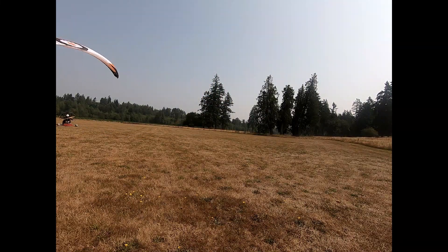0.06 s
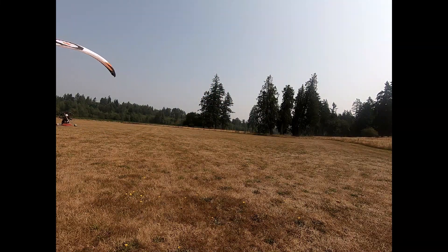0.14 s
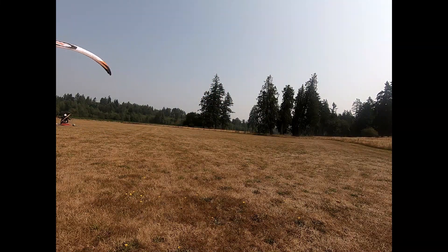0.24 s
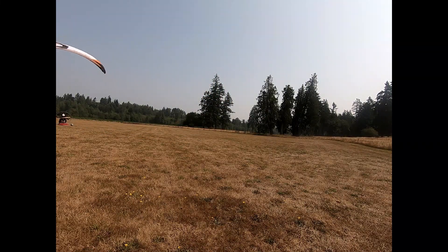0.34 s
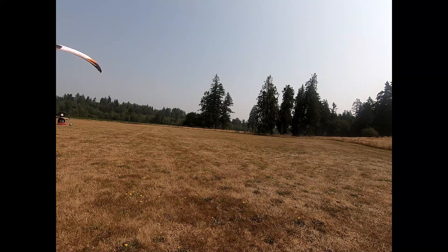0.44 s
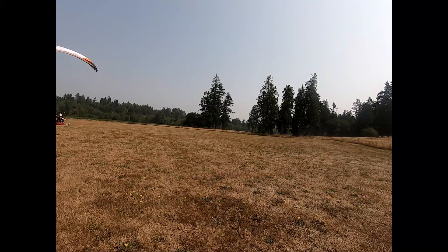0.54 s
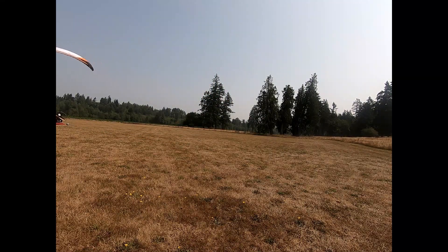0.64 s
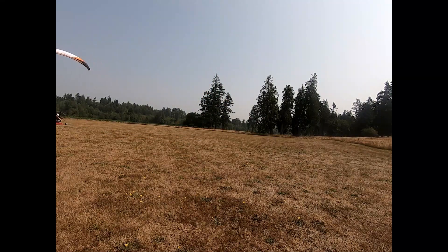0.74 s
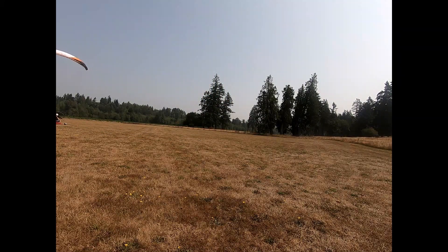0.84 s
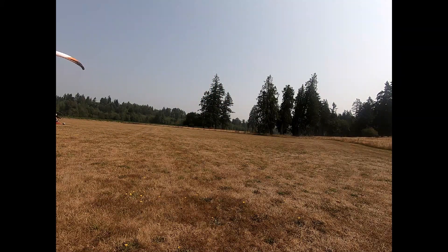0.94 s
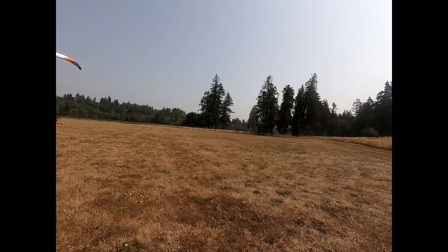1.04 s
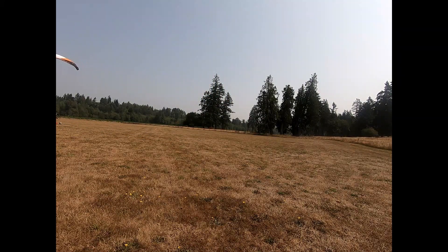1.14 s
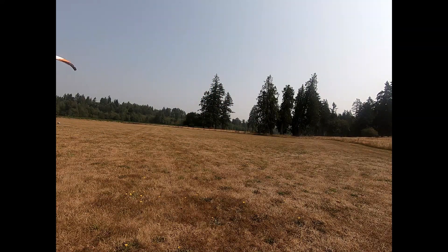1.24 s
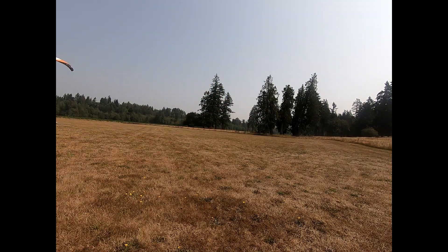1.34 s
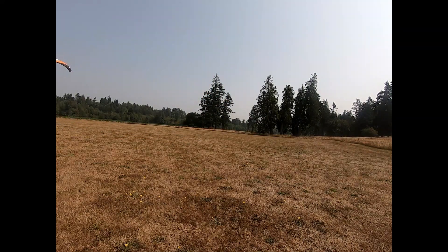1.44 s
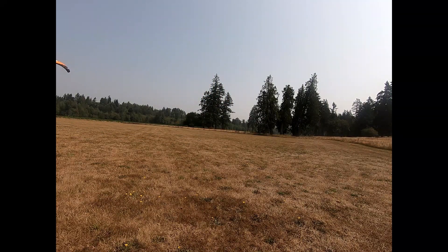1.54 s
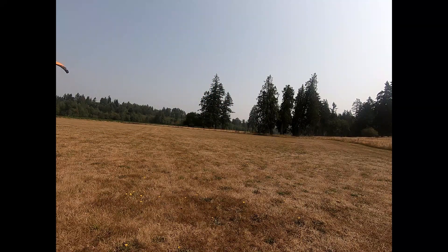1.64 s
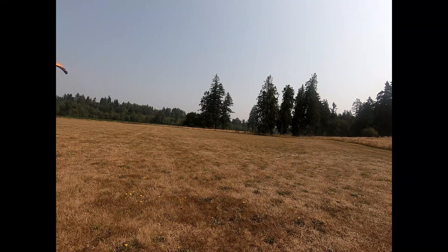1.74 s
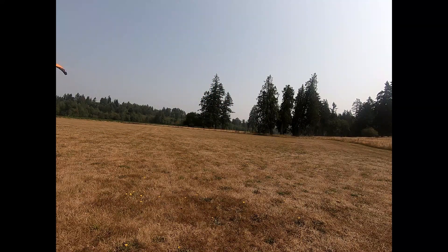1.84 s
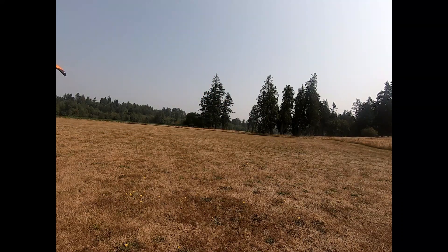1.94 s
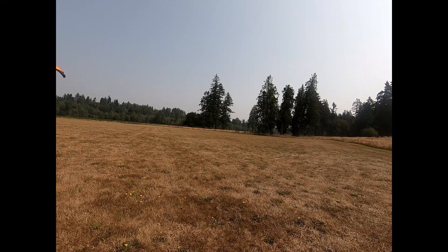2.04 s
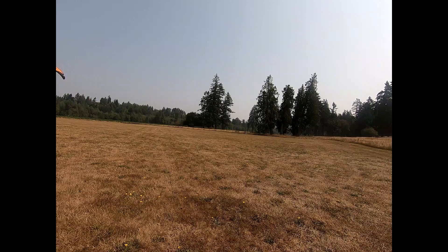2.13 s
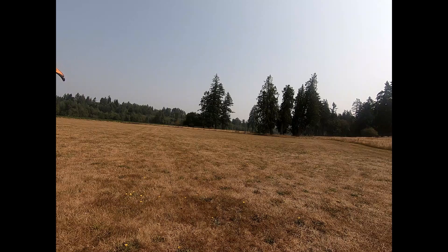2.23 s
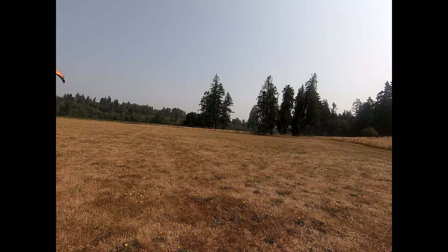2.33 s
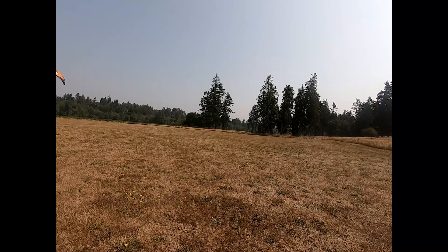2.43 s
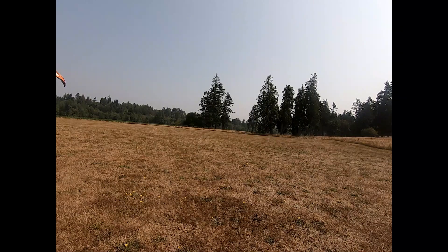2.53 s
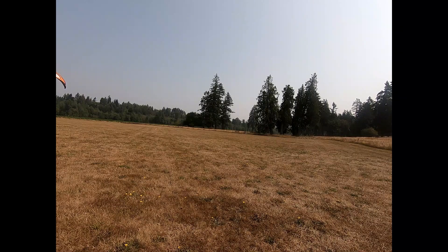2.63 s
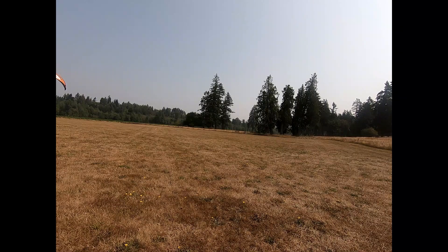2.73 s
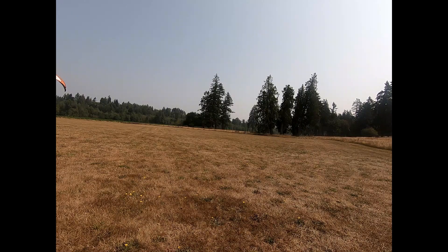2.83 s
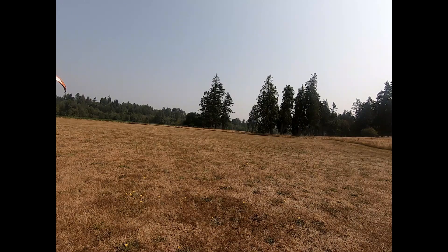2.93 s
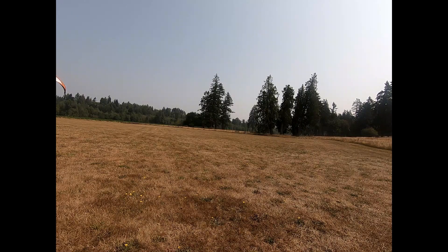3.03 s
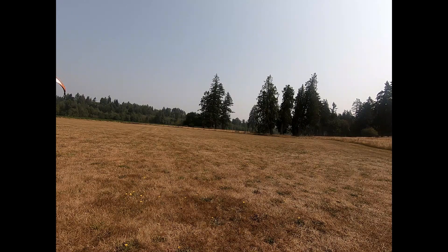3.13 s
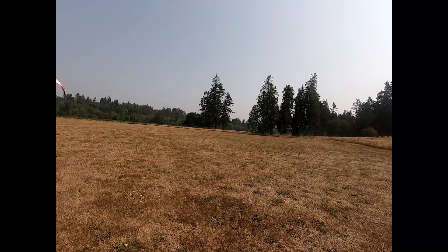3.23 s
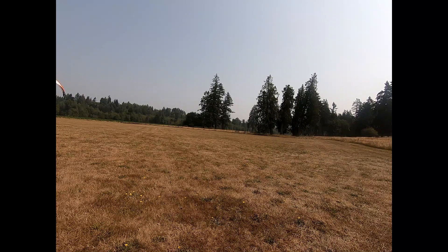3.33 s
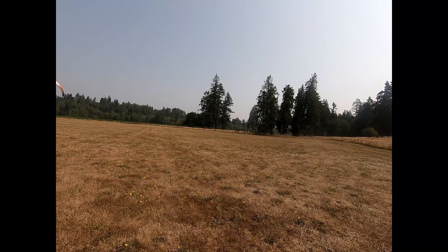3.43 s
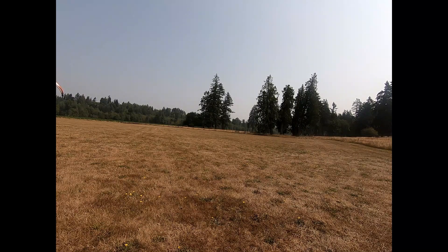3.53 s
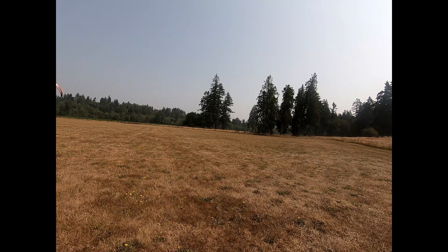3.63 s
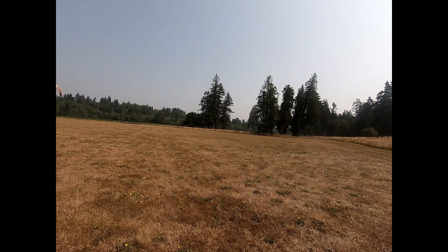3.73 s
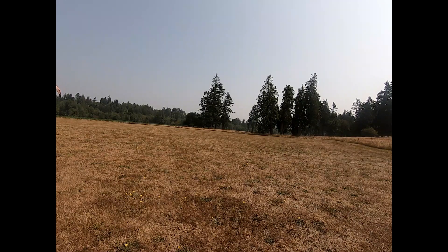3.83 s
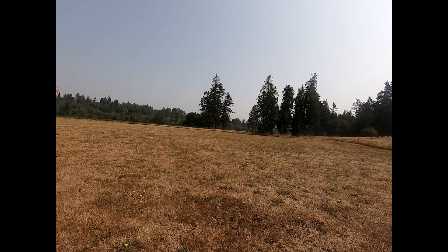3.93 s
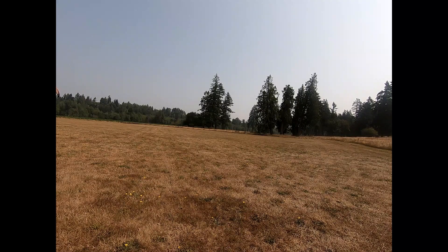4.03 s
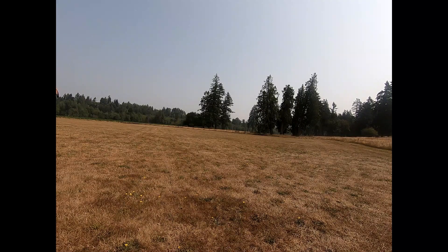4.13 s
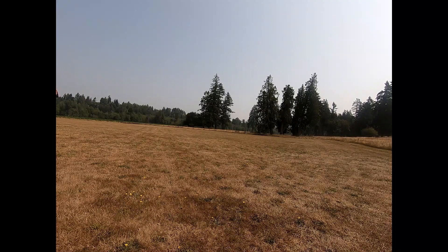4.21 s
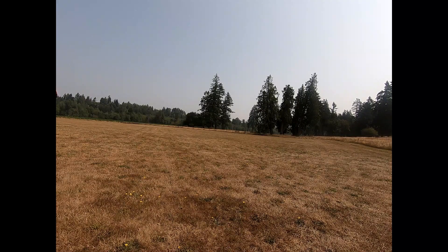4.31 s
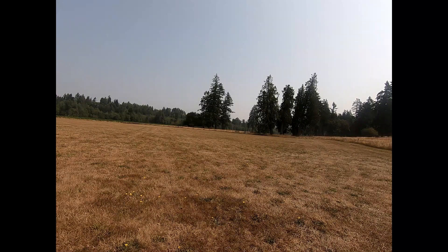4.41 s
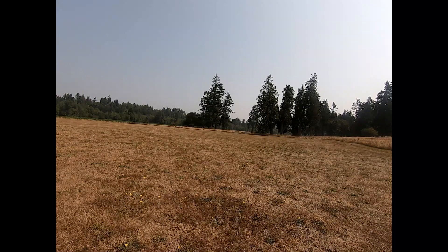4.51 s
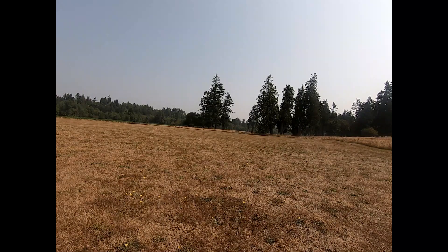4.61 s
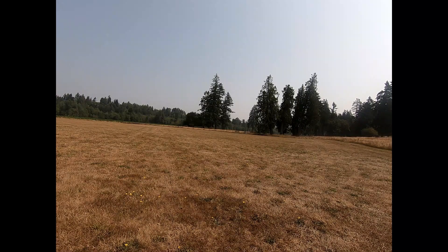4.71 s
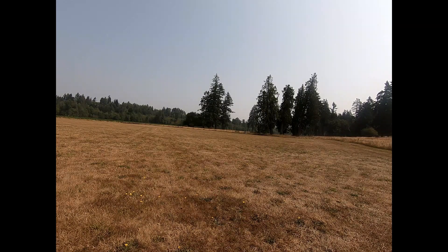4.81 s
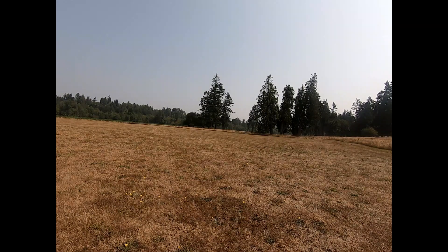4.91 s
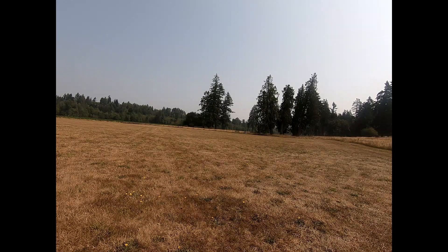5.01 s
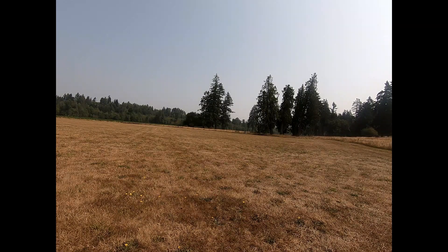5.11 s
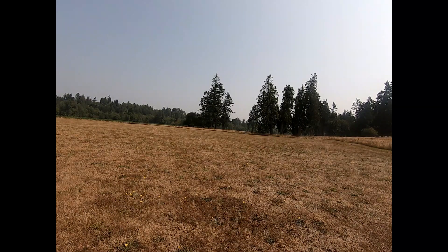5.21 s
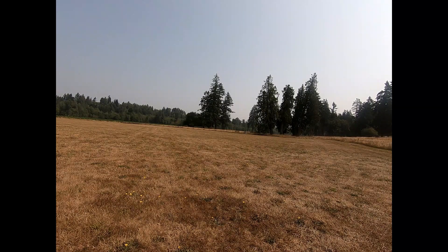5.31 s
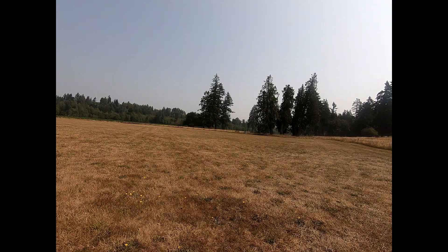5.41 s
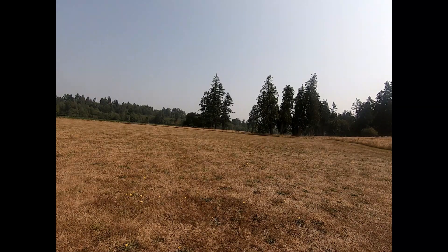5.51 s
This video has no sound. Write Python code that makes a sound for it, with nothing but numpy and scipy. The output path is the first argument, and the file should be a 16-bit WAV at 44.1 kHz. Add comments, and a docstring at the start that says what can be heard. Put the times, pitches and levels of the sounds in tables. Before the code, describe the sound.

A two-stroke paramotor drones away over a dry field, buzzing hard, sagging to a stumbling idle, revving up again, then slowly sinking.

```python
"""A two-stroke paramotor taxis away over a dry field: full throttle, stumbling idle, up again, slowly down.
Low crank orders make the exhaust drone, high orders the rasp; the geared propeller tone beats against them.
Firing-gated noise gives gas, wash and blade hiss; a tree line returns a faint echo.
Low noise makes churn and wind; clustered snaps make a dry rustle close by.
In the last instant the sound jumps, with a tick, to high revs.
"""
import sys
import numpy as np
from scipy import signal
from scipy.fft import rfft, irfft
from scipy.io import wavfile
from scipy.ndimage import uniform_filter1d

SR = 44100
rng = np.random.default_rng(int(sys.argv[2]) if len(sys.argv) > 2 else 0)


def wav_record(signal):
    """Record a signal, one row per channel, as 16-bit PCM in the file named by sys.argv[1]."""
    frames = np.transpose(np.atleast_2d(signal))
    bounded = np.clip(frames, -1, 1)
    # unit amplitude maps onto the largest positive 16-bit level
    quanta = np.round(bounded * 32767).astype(np.int16)
    wavfile.write(sys.argv[1], SR, quanta)


N = 245186
TIME = np.arange(N) / SR
BINS_HZ = np.maximum(np.arange(N // 2 + 1) * SR / N, 1)

# All dB settings are relative: gains, gating and the ports act after them.
# Crank speed: (time [s], rate [firings/s])
CRANK_SPEED = [(0.0, 72.1), (0.3, 84.5), (0.4, 87.1), (0.77, 88.0), (1.14, 88.1), (1.26, 85.6),
               (1.36, 81.5), (1.45, 79.8), (1.57, 76.7), (1.83, 85.5), (1.94, 86.6), (1.98, 83.4),
               (2.1, 71.3), (2.2, 63.3), (2.42, 52.0), (2.61, 45.4), (2.8, 43.2), (3.0, 44.2), (3.1, 47.0),
               (3.2, 52.8), (3.35, 62.0), (3.51, 69.4), (3.79, 79.0), (3.94, 81.1), (4.18, 80.0),
               (4.55, 72.3), (4.85, 66.3), (5.05, 58.9), (5.19, 55.7), (5.49, 52.5)]
# Firing strength, sagging on closed throttle: (time [s], gain [dB])
FIRING_GAIN = [(0.05, 0.5), (1.2, -0.5), (1.55, 0), (2.05, 0.5), (2.25, -4), (2.65, -8), (2.9, -10.5),
               (3.3, 1), (4.36, 1), (4.39, -0.5), (4.8, -4), (5.2, -1)]
# Low exhaust orders, from the first up:
# (level at full speed [dB], slope [dB/doubling], gain while turning away [dB], time of half that gain [s])
EXHAUST_ORDERS = [(-19, 22, 2, 3), (-27, 3, -2.5, 3.3), (-48, -2, 7, 2.1), (-48, -7, -4, 1)]
# Lone hard firings on closed throttle: (time [s], level [dB])
HARD_FIRINGS = [(2.123, -20), (2.154, -24), (2.198, -14), (2.281, -14), (2.295, -14.5), (2.367, -20.5),
                (2.389, -17.5), (2.473, -14), (2.514, -20.5), (2.546, -17), (2.674, -18.5), (2.74, -19),
                (2.81, -18), (2.864, -25), (4.965, -22), (5.101, -24.5), (5.291, -25), (5.331, -20),
                (5.435, -18)]
# Blade tone as the machine turns: (time [s], tone [dB], second [dB], third [dB])
BLADE_LEVELS = [(0.08, -31.5, -36, -48), (0.45, -27, -44, -46.5), (1.08, -27, -46, -55),
                (1.269, -39, -44.5, -55), (1.8, -39.5, -39.5, -48.5), (2.101, -29.5, -40.5, -65),
                (2.45, -32.5, -42, -50), (2.7, -41.5, -38, -42), (2.95, -30, -32, -36.5),
                (3.15, -28, -25.5, -38.5), (3.3, -23.5, -30, -44), (3.6, -31.5, -36, -49.5),
                (3.8, -29.5, -39, -61.5), (4.1, -31, -43.5, -56.5), (4.699, -29, -43, -45),
                (5.3, -28, -36, -49)]

# Rasp order levels when close, turning, away: (frequency [Hz], level [dB])
RASP_CLOSE = [(300, -0.5), (440, -2), (527, 3), (615, 5.5), (704, 2), (790, 2), (880, 0), (965, 3),
              (1053, 4), (1140, -1), (1230, 2), (1320, -0.5), (1404, 3), (1750, -4), (2500, -0.5),
              (4000, -8)]
RASP_TURNED = [(400, 6), (480, 3), (600, 0), (720, -1), (850, 3.5), (990, 7), (1150, 2), (1350, -3),
               (1750, -7), (2500, -13), (4000, -16)]
RASP_AWAY = [(280, -3), (400, -3), (520, 0), (720, 2.5), (1000, 1), (1400, 4.5), (1750, -8.5),
             (2500, -16.5), (4000, -18.5)]
# Exhaust rasp and gas noise, midrange: (time [s], level [dB])
RASP_LEVEL = [(0.08, -42.5), (0.26, -45), (1.58, -52), (1.8, -49.5), (1.98, -48.5), (2.19, -55),
              (2.65, -57.5), (3.69, -54.5), (4.3, -55.5), (5.35, -58), (5.42, -58)]
# Exhaust gas noise: (frequency [Hz], density [dB/Hz])
GAS_COLOUR = [(200, -8), (350, 7.5), (450, 4), (550, -3), (750, -2), (1100, -9), (1500, -10), (2200, -11.5)]

# Propeller wash, upper midrange: (time [s], level [dB])
WASH_LEVEL = [(0.08, -41.5), (0.91, -54), (0.97, -58.5), (1.14, -56), (1.61, -68), (1.86, -64), (2.4, -58),
              (2.95, -68), (3.14, -63.5), (3.66, -68), (4.15, -60.5), (5.42, -65.5)]
# Wash noise: (frequency [Hz], density [dB/Hz])
WASH_COLOUR = [(800, -11.5), (1300, -4.5), (1700, -4.5), (2300, -4), (2900, -9), (4000, -27.5)]
# Blade whoosh as the revs return: (frequency [Hz], density [dB/Hz])
WHOOSH_COLOUR = [(1200, -15.5), (1700, -3.5), (2050, 0.5), (2450, -3.5), (2800, -21)]
# Blade-tip hiss, treble: (time [s], level [dB])
HISS_LEVEL = [(0.03, -43.5), (0.36, -44), (0.75, -46.5), (0.95, -49), (1.05, -55.5), (1.25, -60),
              (1.6, -60), (1.87, -59), (2.03, -62), (2.55, -65.5), (3.6, -67), (4.25, -63), (5.16, -71.5),
              (5.42, -70)]
# Blade hiss, strongly chopped and steadier parts: (frequency [Hz], density [dB/Hz])
CHOP_COLOUR = [(1700, -29.5), (2600, -1), (3500, 4), (4200, -8.5), (6500, -14.5), (7400, -22.5),
               (9000, -46)]
HISS_COLOUR = [(3000, -14), (4200, -4.5), (5000, -2.5), (6000, 1), (6950, -5), (7400, -14.5), (8400, -22),
               (10500, -21.5), (11500, -28.5), (13500, -25), (15500, -48.5)]

# Low churn of air: (time [s], level [dB])
CHURN_LEVEL = [(0.05, -32), (0.6, -37), (1.9, -37), (2.6, -41), (3.4, -40), (4.6, -43.5), (5.3, -38)]
# Churn noise: (frequency [Hz], density [dB/Hz])
CHURN_COLOUR = [(30, -18), (60, -5), (140, -3), (220, -8.5), (320, -14.5), (500, -26.5), (900, -47.5)]
# Breeze: (time [s], level [dB])
WIND_LEVEL = [(0.3, -33), (0.75, -41), (1.15, -31), (1.26, -29.5), (1.6, -30), (2.2, -32.5), (2.65, -33.5),
              (3.05, -32), (3.4, -35.5), (4.7, -39), (5.25, -35.5), (5.52, -44)]
# Wind rumble: (frequency [Hz], density [dB/Hz])
GUST_COLOUR = [(15, -11.5), (30, -4.5), (50, 1.5), (90, 3), (200, -34.5), (500, -37)]
# Dry rustles: (time [s], level [dB], decay [s])
RUSTLES = [(2.498, -58, .004), (2.539, -56, .005), (2.623, -47.5, .007), (2.739, -48, 0.0092),
           (2.756, -49, 0.0087), (2.841, -56, .005), (2.856, -45.5, 0.0055), (2.878, -53.5, 0.017),
           (2.988, -52, .005), (3.004, -51, 0.006), (3.032, -56, .005), (3.082, -41.5, 0.0069),
           (3.098, -45, 0.0088), (3.113, -46, 0.01), (3.13, -45.5, .009), (3.143, -47.5, 0.025),
           (3.165, -61, .01), (3.184, -50, 0.0088), (3.211, -49.5, 0.0091), (3.273, -44, 0.0054),
           (3.288, -48, 0.014), (3.356, -49, 0.0092), (3.389, -49, 0.0079), (3.414, -52, .005),
           (3.467, -50, 0.0059)]
# Rustle grains: (frequency [Hz], level [dB])
RUSTLE_COLOUR = [(2500, -12), (4500, -4.0), (6300, 5.0), (7100, -7.0), (8000, -19.5), (12000, -34.0)]

# Microphone ports, balance: (frequency [Hz], left over right [dB])
PORT_BALANCE = [(60, -1.5), (100, 0), (170, -5.5), (300, -9), (510, -12.5), (870, 0.5), (1490, 4),
                (2000, 5.5), (2600, 7.5), (3400, 2.5), (4340, 3.5), (5500, -9), (7410, -3.5), (9000, 1),
                (12000, -5)]
# Microphone ports, phase: (frequency [Hz], left lead [rad])
PORT_PHASE = [(100, 0.37), (340, 0.46), (450, 1.5), (620, 2.18), (1460, 1.96), (2500, 1.5), (3100, 2),
              (3880, 0.98), (4300, 0.87), (5000, 0.44), (6100, 1.9), (7300, 3.4), (12000, 1.6)]

FULL_SPEED_HZ, INERTIA_S = 88, .06  # firing rate; window that rounds off speed changes
BLADES_PER_TURN = 1.392  # blade passes per crank turn, geared
TURN_WIDTH_S = 0.22
CRACK_TURNS, CRACK_HEIGHT, INTAKE_HEIGHT = 0.13, 7.5, 2.7  # decay; heights over steady flow of 1
CRACK_LAG_TURNS = 0.17  # crack after start of low pressure pulse
INTAKE_LEAD_TURNS, INTAKE_SHARE = 0.4, 0.97  # weaker puff ahead of each crack
WHOOSH_S, WHOOSH_WIDTH_S, WHOOSH_DB = 3.6, 0.34, -60
NEAR_DB, NEAR_FADE_S, RECEDE_DB_PER_S = 1.5, 0.26, 0.78  # extra drone while close; slow loss
ECHO_S, ECHO_DB = .33, -24.5
CUTOFF_HZ = 15000

# After the jump
BURST_S, BURST_SPEED_HZ, BURST_FIRING_DB, BURST_BLADE_DB = 5.496, 91, 2.5, -22
BURST_RASP_DB, BURST_WASH_DB, BURST_HISS_DB = -49.5, -55, -64.5


def from_db(db):
    """Decibels to gain."""
    return 10 ** (np.asarray(db) / 20)


def rms_one(x):
    """Scale to unit rms."""
    return x / np.sqrt(np.mean(x ** 2) + 1e-20)


def bell(x, centre, width):
    """Smooth hump of height 1."""
    return np.exp(-((x - centre) / width) ** 2)


def at_hz(points, hz):
    """Read a spectrum on a log-frequency axis."""
    f_hz, value = np.transpose(points)
    return np.interp(np.log(hz), np.log(f_hz), value)


def curve(points):
    """Time curve at every sample."""
    return np.interp(TIME, *np.transpose(points))


def played(points, burst):
    """Time curve that jumps to its closing value at the burst."""
    return np.where(TIME < BURST_S, curve(points), burst)


def drift(rate_hz):
    """Smooth random wander, about `rate_hz` turns a second, spread 1."""
    pole = np.exp(-200 * np.pi * rate_hz / SR)
    kicks = rng.standard_normal(N // 100 + 1002)
    slow = signal.lfilter([1], [1, -2 * pole, pole * pole], kicks)[1000:]
    return np.interp(np.arange(N) / 100, np.arange(len(slow)), rms_one(slow))


def noise(colour):
    """Coloured noise, rolled off above its last point, rms 1."""
    roll_off = 1 / (1 + (BINS_HZ / colour[-1][0] / 2) ** 4)
    spectrum = rfft(rng.standard_normal(N)) * from_db(at_hz(colour, BINS_HZ))
    return rms_one(irfft(spectrum * roll_off, N))


def airy(colour, spread):
    """Stereo noise: a common part plus an independent share per side."""
    sides = np.array([noise(colour), noise(colour)])
    return rms_one(noise(colour) + spread * sides)


def per_firing(turns):
    """Random value drawn at every crank turn, interpolated between."""
    return np.interp(turns, np.arange(1000), rng.standard_normal(1000))


def tree_echo(x):
    """Late, faint copy from the tree line; lags in pitch during a glide."""
    return from_db(ECHO_DB) * np.interp(TIME - ECHO_S, TIME, x, left=0)


def leftward(near_db=5.5, far_db=-4.5):
    """Body shadows the right port's treble while the machine is close on the left; balance then reverses."""
    pan_db = np.interp(TIME, [1.2, 3.0], [near_db, far_db])
    return from_db(np.array([pan_db / 10, -pan_db]))


def wind():
    """Breeze as a wide low rumble that comes and goes."""
    return from_db(curve(WIND_LEVEL)) * airy(GUST_COLOUR, spread=0.8)


def churn():
    """Low churn of air as slowly varying noise."""
    return from_db(curve(CHURN_LEVEL)) * airy(CHURN_COLOUR, spread=0.4)


def rustle(grains_per_s=3500, gain_db=-10.5, attack_s=0.0005):
    """Crackles of dry stalks, each a cluster of tiny snaps."""
    swell = 0
    for s, db, decay_s in RUSTLES:
        fall = np.maximum((TIME - s) / decay_s, (s - TIME) / attack_s)
        swell = swell + from_db(db) * np.exp(-fall)
    snaps = (rng.random((3, N)) < grains_per_s / SR) * rng.standard_normal((3, N))
    stereo = snaps[0] + 0.66 * snaps[1:]
    grains = irfft(rfft(stereo) * from_db(at_hz(RUSTLE_COLOUR, BINS_HZ)), N)
    return from_db(gain_db) * swell * rms_one(grains)


def tick():
    """Negative step at the jump with a fast exponential decay."""
    return -from_db(-19.5) * (TIME >= BURST_S) * np.exp(-np.abs(TIME - BURST_S) / 0.00061)


def puffs(turns, depth, uneven_db):
    """Intake swell, then a fast-dying crack as the port opens; crack strength varies by turn."""
    share = turns % 1
    strength_db = uneven_db * np.clip(rng.standard_normal(1000), -2, 2)
    strength = from_db(strength_db)[turns.astype(int)]
    crack = CRACK_HEIGHT * strength * np.exp(-share / CRACK_TURNS)
    intake = INTAKE_HEIGHT * bell(share, .82, .25)
    return rms_one((1 + crack + intake) ** depth)


def hiss(turns, clear, gate):
    """Blade-tip hiss: a chopped, panned part and a more gently pulsed part."""
    level_db = played(HISS_LEVEL, BURST_HISS_DB)
    chop = from_db(level_db - 4.5) * airy(CHOP_COLOUR, spread=0.28) * gate
    pulse = puffs(turns - .08, depth=.6 * clear, uneven_db=2.0)
    steadier = from_db(level_db - 3.0) * airy(HISS_COLOUR, spread=0.5) * pulse
    return chop * leftward() + steadier


def whoosh(gate):
    """Blade noise that swells once as the revs return."""
    swell = from_db(WHOOSH_DB) * bell(TIME, WHOOSH_S, WHOOSH_WIDTH_S)
    return swell * airy(WHOOSH_COLOUR, spread=0.42) * gate * leftward()


def wash(gate):
    """Propeller wash: noise pulsed at the firing rate."""
    level_db = played(WASH_LEVEL, BURST_WASH_DB)
    return from_db(level_db - 0.53) * airy(WASH_COLOUR, spread=0.67) * gate * leftward()


def gas(rasp_db, pitched, gate):
    """Exhaust gas noise: the unpitched share of the rasp, lightly pulsed."""
    level = from_db(rasp_db + 0.5) * np.sqrt(1 - pitched)
    return level * airy(GAS_COLOUR, spread=0.47) * rms_one(gate ** 0.31)


def rasp(turns, speed_hz, fade_db=3.5, jitter_turns=0.0015, count=48):
    """Crack and intake puff repeat each turn: high orders that fade in and out and blur with distance."""
    angle = 2 * np.pi * (turns + jitter_turns * per_firing(turns))
    close = np.interp(TIME, [1.1, 1.45], [1, 0])
    away = np.interp(TIME, [2.1, 3.0], [0, 1])
    turned = 1 - close - away
    smear_rad = np.interp(TIME, [1.15, 1.5, 2.1, 3.2], [.3, .7, .7, 1.6])
    out = 0
    for k in range(5, count):
        hz = k * speed_hz
        db = close * at_hz(RASP_CLOSE, hz) + turned * at_hz(RASP_TURNED, hz) + away * at_hz(RASP_AWAY, hz)
        intake_rad = 2 * np.pi * k * INTAKE_LEAD_TURNS + rng.normal(0, .7)
        pair_rad = np.angle(1 + INTAKE_SHARE * np.exp(1j * intake_rad))
        level = from_db(db + fade_db * drift(6))
        out = out + level * np.sin(k * angle + pair_rad + smear_rad * drift(22))
    return rms_one(out)


def air_sounds(turns, speed_hz, echo_db=6):
    """Rasp, gas, wash and hiss; firing pulse distinct under load and nearby, blurred with distance."""
    clear = np.interp(speed_hz, [48, 82], [.35, .9]) * np.interp(TIME, [2.2, 3.2], [1, .55])
    pitched = clear * np.interp(TIME, [1.1, 1.5, 2.3, 3.2], [.88, .78, .78, .5])
    gate = puffs(turns, depth=clear, uneven_db=1.5)
    rasp_db = played(RASP_LEVEL, BURST_RASP_DB)
    buzz = from_db(rasp_db + 1.8) * np.sqrt(pitched) * rasp(turns, speed_hz)
    buzz = buzz * puffs(turns, depth=.4, uneven_db=2.5)
    blade_air = wash(gate) + whoosh(gate) + hiss(turns, clear, gate)
    return buzz + from_db(echo_db) * tree_echo(buzz) + gas(rasp_db, pitched, gate) + blade_air


def propeller(turns, waver_db=0.6, fourth_db=-14, surge=0.045):
    """Blade-passing tone and overtones; every firing shoves the blades slightly."""
    blade = 2 * np.pi * BLADES_PER_TURN * turns
    s, *columns = np.transpose(BLADE_LEVELS)
    levels_db = [np.interp(TIME, s, db) + waver_db * drift(2.1) for db in columns]
    levels_db[0] = np.where(TIME < BURST_S, levels_db[0], BURST_BLADE_DB)
    levels_db.append(levels_db[2] + fourth_db)  # fourth follows third
    tone = sum(from_db(db) * np.cos(k * blade) for k, db in enumerate(levels_db, 1))
    return -np.sqrt(2) * tone * (1 + surge * np.cos(2 * np.pi * turns))


def pops(low_hz=55, high_hz=140, gain_db=-2.0, muffler_hz=215):
    """Hard firings as impulses thumping through the muffler filters."""
    kicks = np.zeros(N)
    for s, db in HARD_FIRINGS:
        kicks[int(s * SR)] = from_db(db + gain_db)
    band = signal.butter(2, [low_hz, high_hz], "band", fs=SR, output="sos")
    muffler = signal.butter(4, muffler_hz, fs=SR, output="sos")
    thump = signal.sosfilt(muffler, signal.sosfilt(band, signal.unit_impulse(SR // 10)))
    return signal.fftconvolve(kicks, thump / np.abs(thump).max())[:N]


def exhaust(turns, speed_hz, steady_rough=0.025, idle_rough=0.65):
    """Muffler passes a few low orders that follow the revs; firing grows uneven as revs sink."""
    doublings = np.log2(speed_hz / FULL_SPEED_HZ)
    drone = 0
    for k, (full_db, slope_db, turn_db, turn_s) in enumerate(EXHAUST_ORDERS, 1):
        turned = (1 + np.tanh((TIME - turn_s) / TURN_WIDTH_S)) / 2
        level = from_db(full_db + slope_db * doublings + turn_db * turned)
        drone = drone + level * np.cos(2 * np.pi * k * turns - np.pi / 3)
    rough = np.interp(speed_hz, [48, 66], [idle_rough, steady_rough])
    return np.sqrt(2) * drone * (1 + rough * per_firing(turns))


def scene():
    """Engine, propeller and their noise follow one crank; wind and rustle lie close by."""
    revs_hz = uniform_filter1d(curve(CRANK_SPEED), int(INERTIA_S * SR))
    speed_hz = np.where(TIME < BURST_S, revs_hz, BURST_SPEED_HZ)
    # off throttle: uneven crank, wavering blade tone
    idling = np.interp(speed_hz, [45, 80], [1, .12])
    turns = np.cumsum(speed_hz * (1 + 0.0057 * idling * drift(8.2))) / SR
    engine = from_db(played(FIRING_GAIN, BURST_FIRING_DB)) * exhaust(turns, speed_hz)
    blades = from_db(1.72 + 1.2 * idling * drift(27)) * propeller(turns)
    near = np.exp(-TIME / NEAR_FADE_S)
    distance = from_db(NEAR_DB * near - RECEDE_DB_PER_S * TIME)
    drone = distance * (engine + blades)
    machine = drone + tree_echo(drone) + pops() + air_sounds(turns - CRACK_LAG_TURNS, speed_hz)
    return machine + churn() + wind() + rustle() + tick()


def record(dry):
    """Camera body shades and delays its two ports differently; the top is cut."""
    half = from_db(at_hz(PORT_BALANCE, BINS_HZ) / 2) * np.exp(.5j * at_hz(PORT_PHASE, BINS_HZ))
    ports = np.array([half, 1 / half])
    ports = ports / np.sqrt(np.abs(ports.mean(axis=0)) ** 2 + 0.037)  # even out the mono sum
    size = 1024
    window = np.hanning(2 * size + 1)
    responses = np.roll(irfft(ports, N), size, axis=1)[:, :2 * size + 1] * window
    padded = np.pad(dry, [(0, 0), (size, size)], "reflect", reflect_type="odd")
    heard = signal.fftconvolve(padded, responses, "valid", axes=1)
    soft_ends = np.minimum(1, np.minimum(TIME, TIME[-1] - TIME) / .003)
    top_cut = signal.ellip(8, .1, 80, CUTOFF_HZ, fs=SR, output="sos")
    return signal.sosfilt(top_cut, heard * soft_ends)


dry = scene()
out = record(dry)
wav_record(out)
```